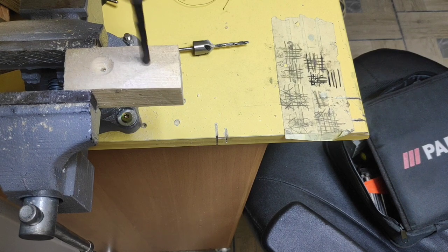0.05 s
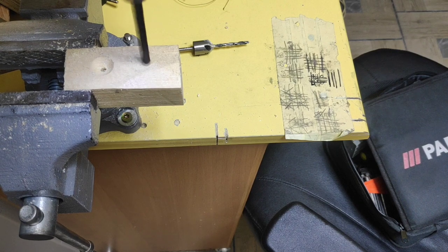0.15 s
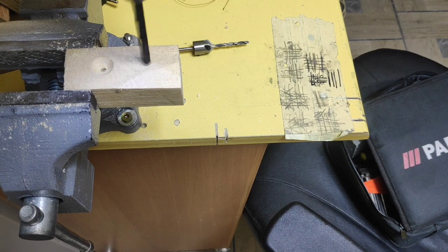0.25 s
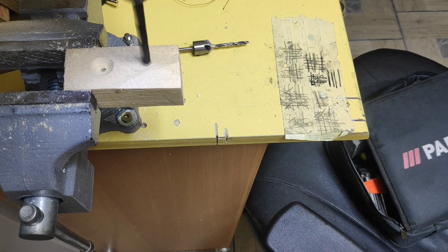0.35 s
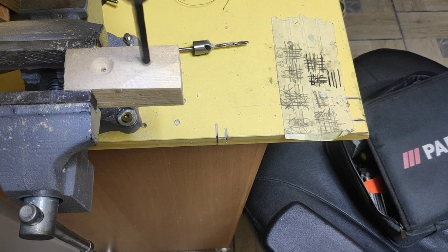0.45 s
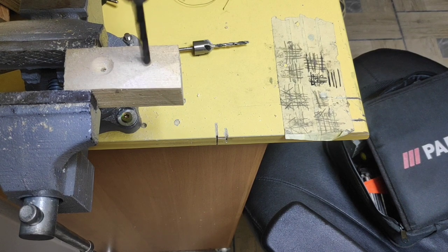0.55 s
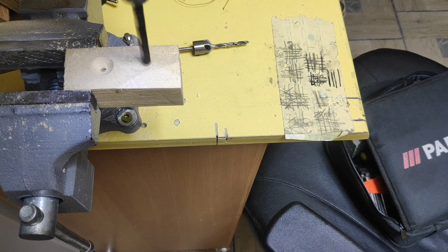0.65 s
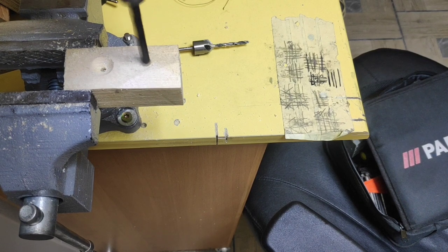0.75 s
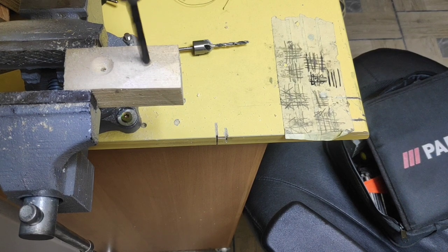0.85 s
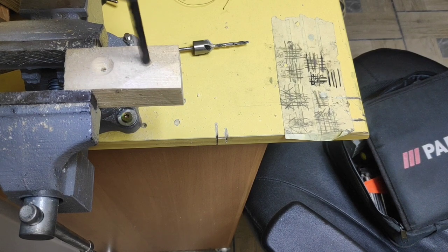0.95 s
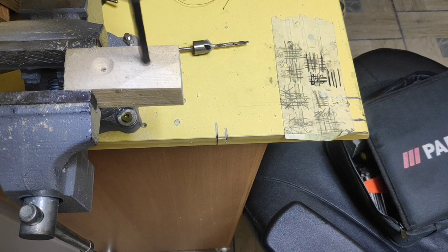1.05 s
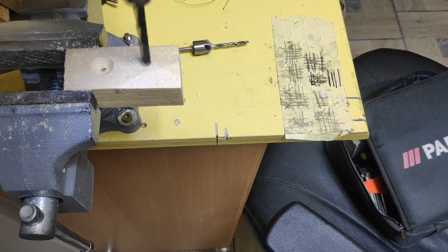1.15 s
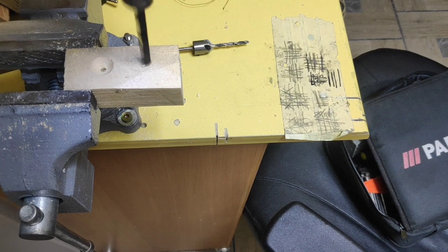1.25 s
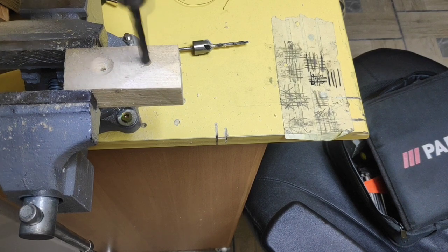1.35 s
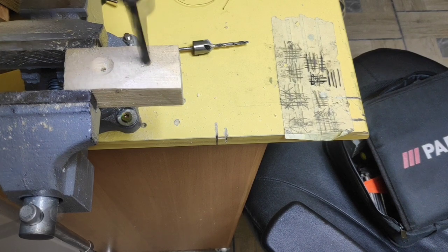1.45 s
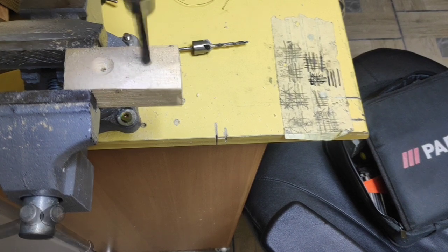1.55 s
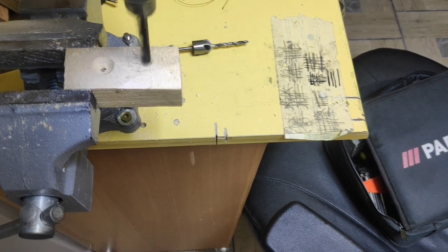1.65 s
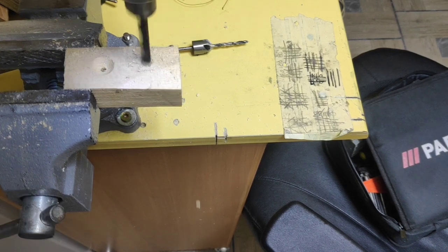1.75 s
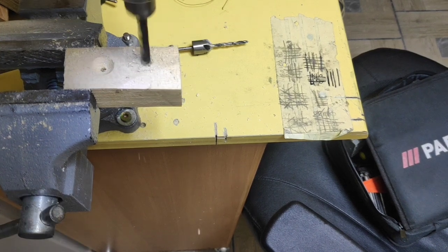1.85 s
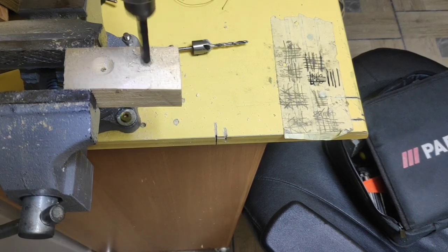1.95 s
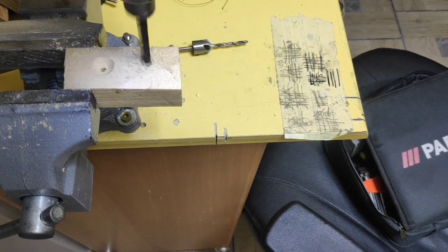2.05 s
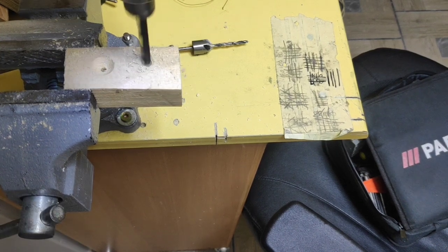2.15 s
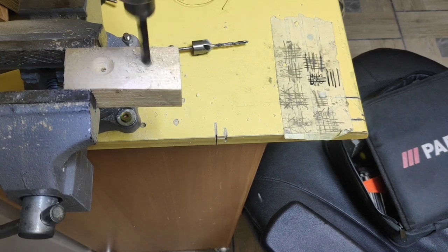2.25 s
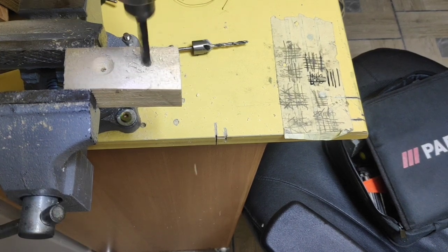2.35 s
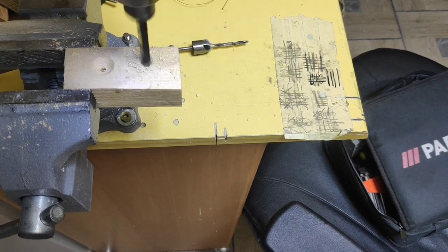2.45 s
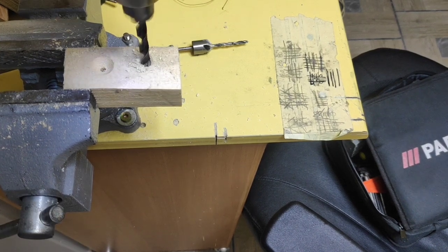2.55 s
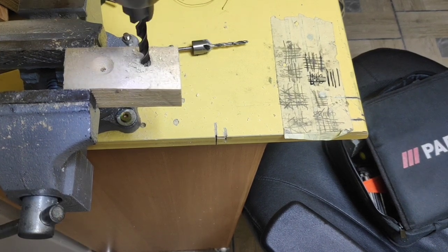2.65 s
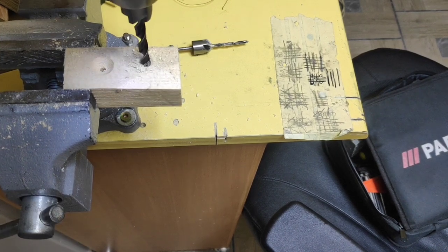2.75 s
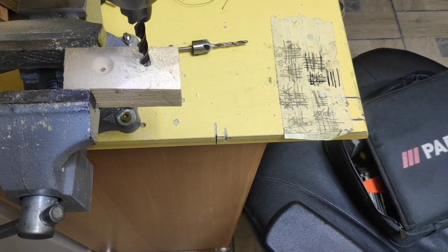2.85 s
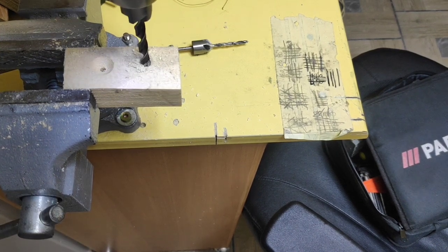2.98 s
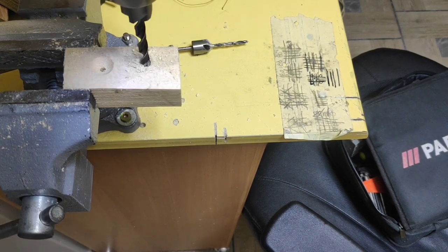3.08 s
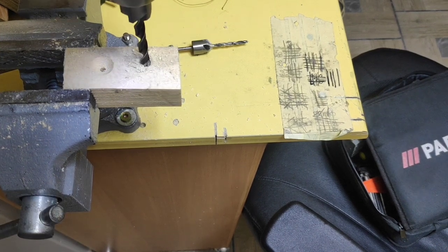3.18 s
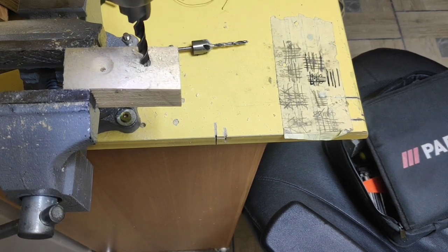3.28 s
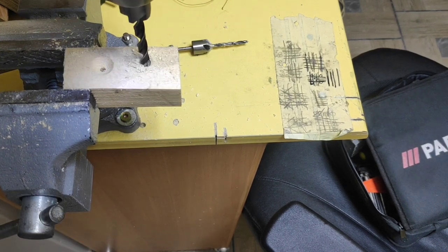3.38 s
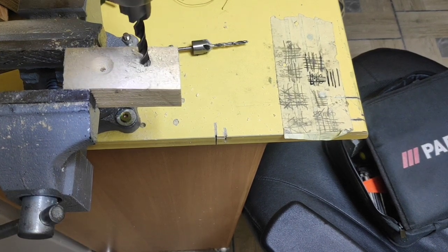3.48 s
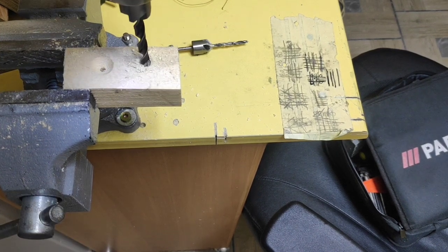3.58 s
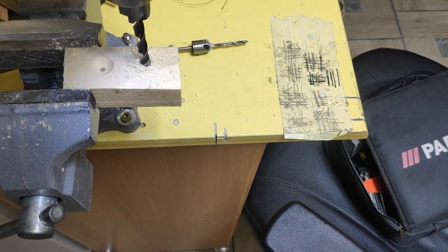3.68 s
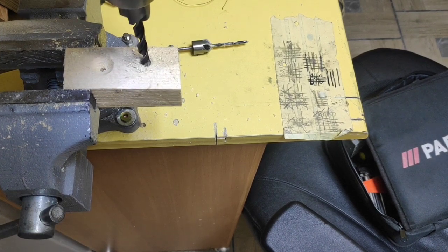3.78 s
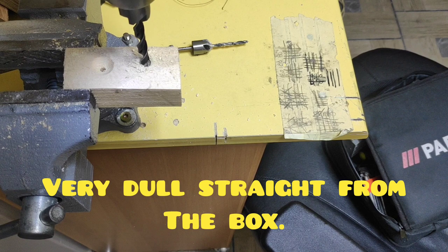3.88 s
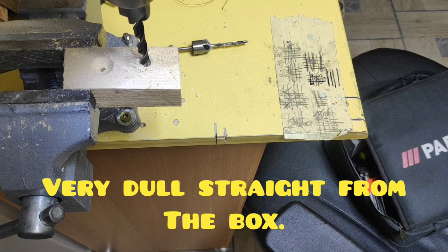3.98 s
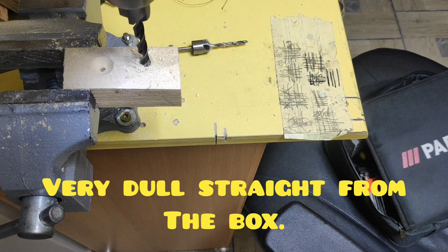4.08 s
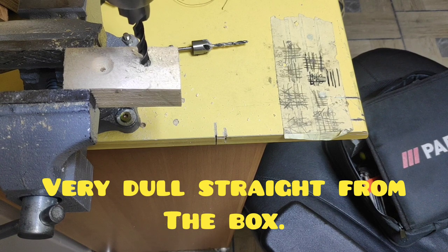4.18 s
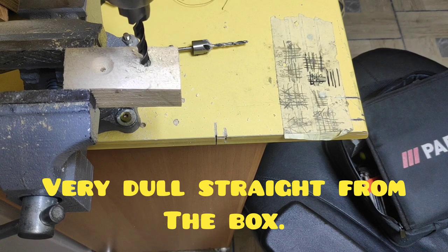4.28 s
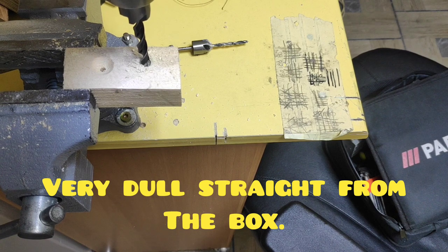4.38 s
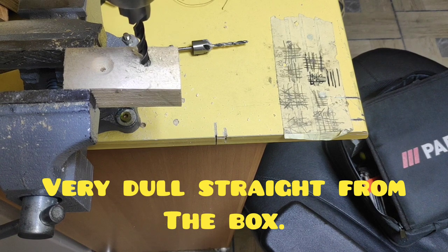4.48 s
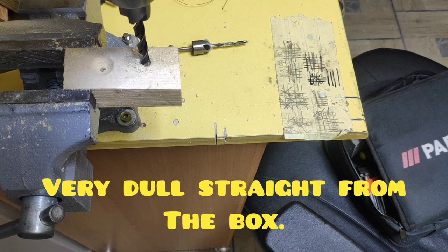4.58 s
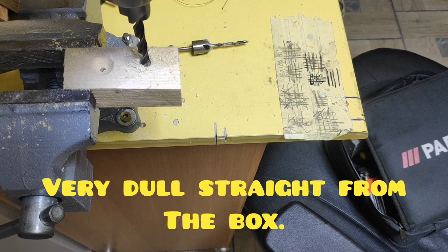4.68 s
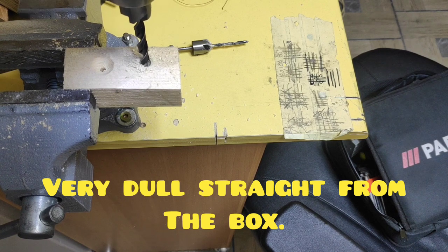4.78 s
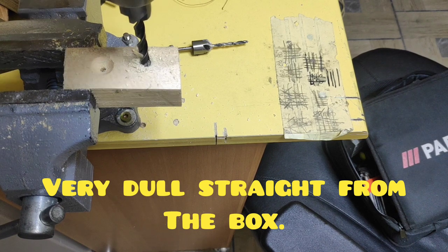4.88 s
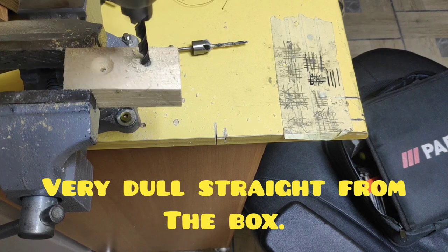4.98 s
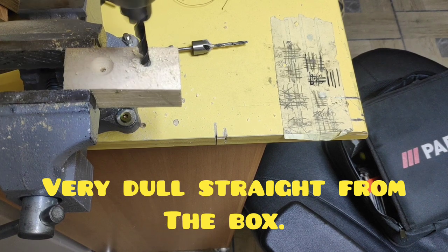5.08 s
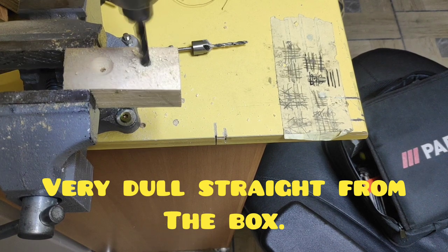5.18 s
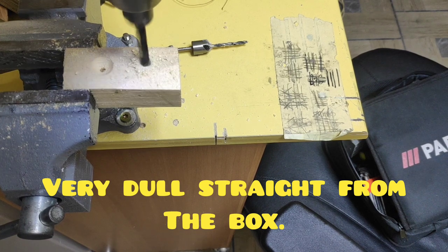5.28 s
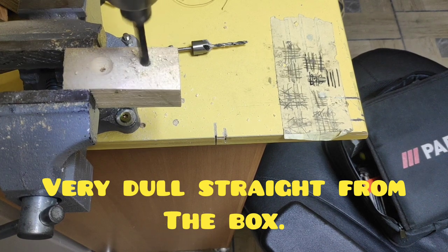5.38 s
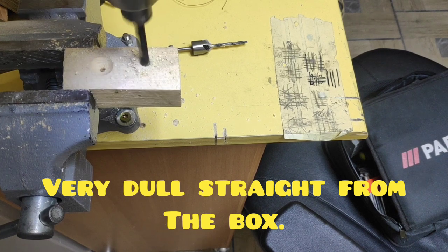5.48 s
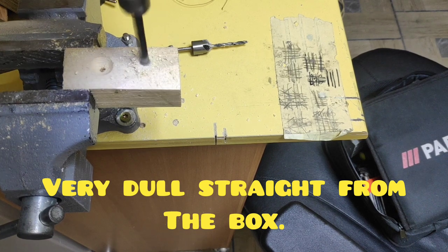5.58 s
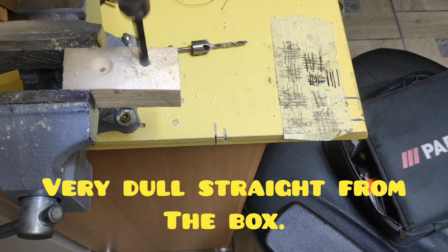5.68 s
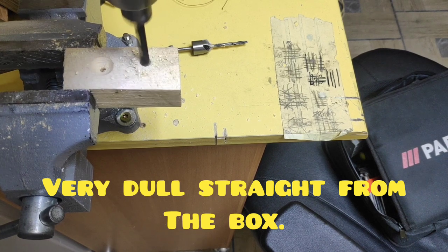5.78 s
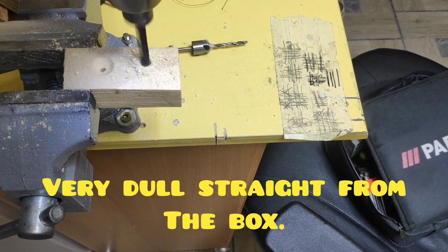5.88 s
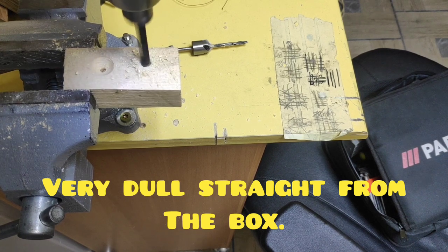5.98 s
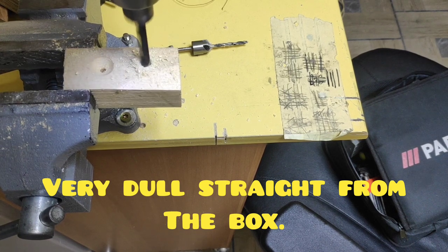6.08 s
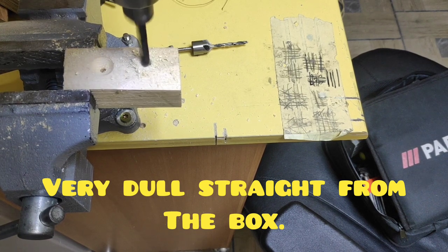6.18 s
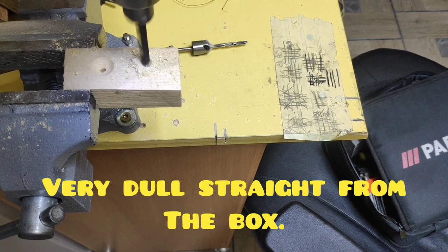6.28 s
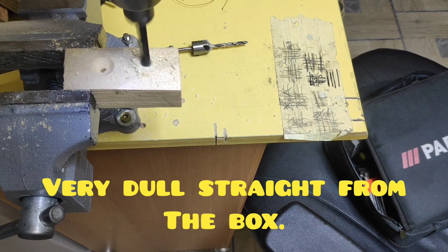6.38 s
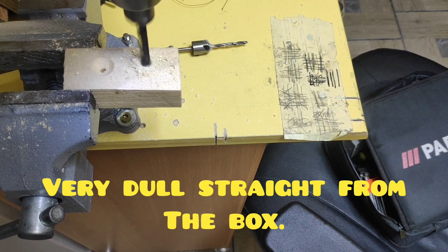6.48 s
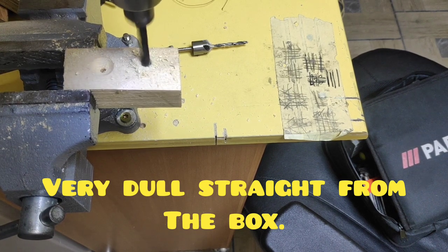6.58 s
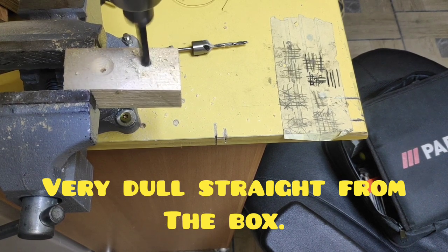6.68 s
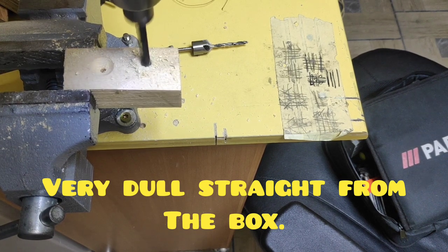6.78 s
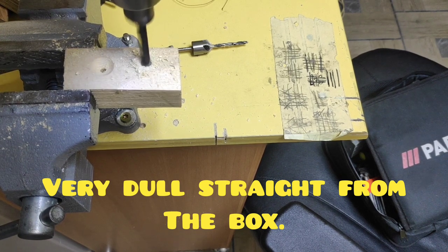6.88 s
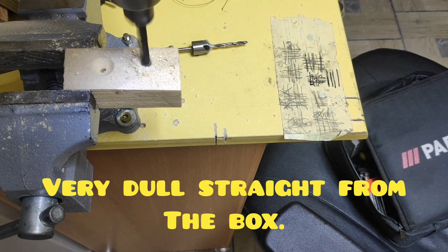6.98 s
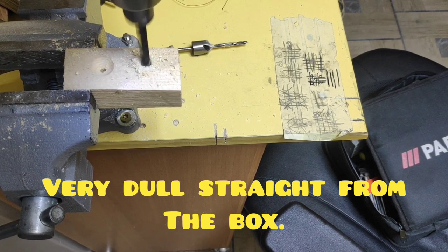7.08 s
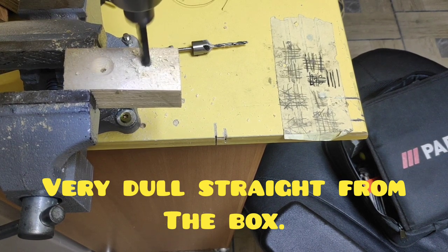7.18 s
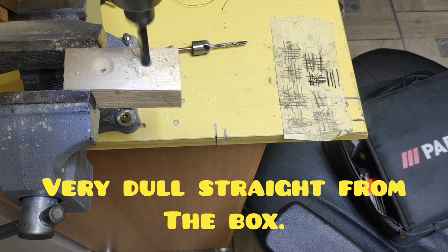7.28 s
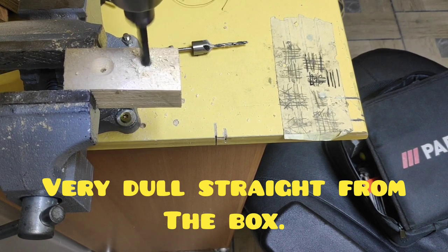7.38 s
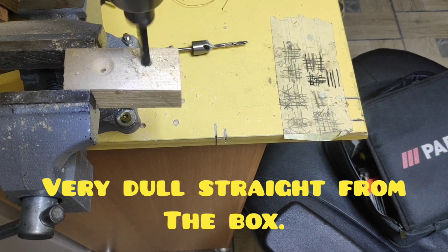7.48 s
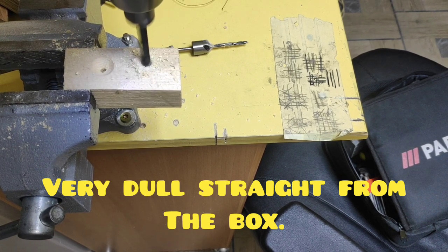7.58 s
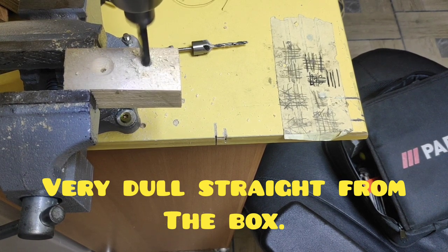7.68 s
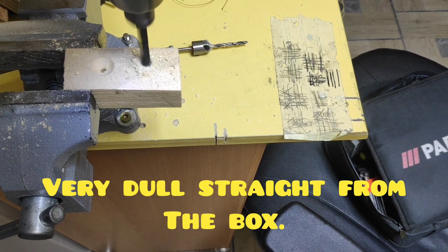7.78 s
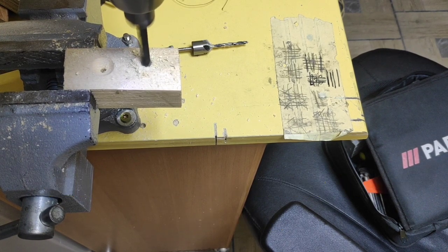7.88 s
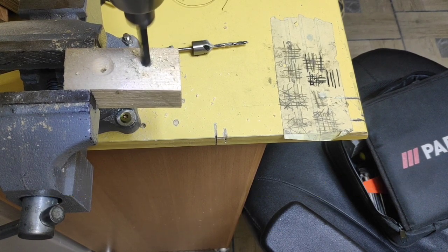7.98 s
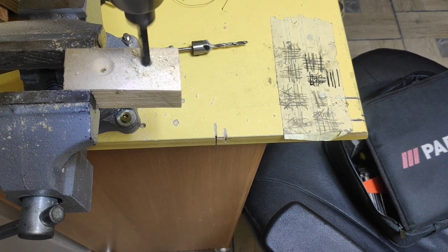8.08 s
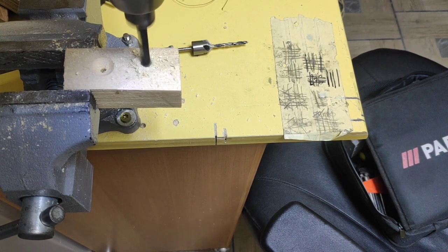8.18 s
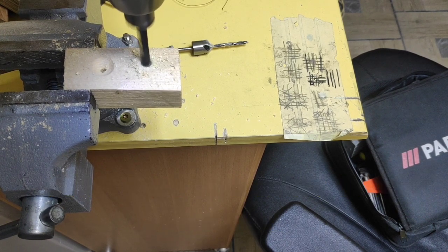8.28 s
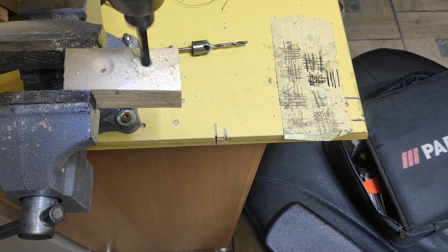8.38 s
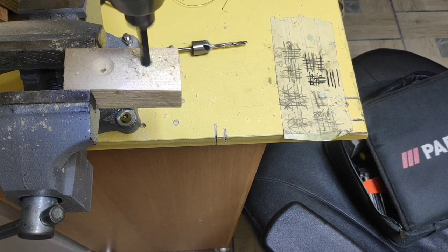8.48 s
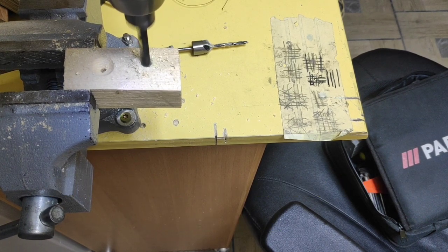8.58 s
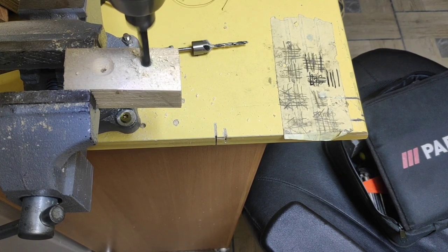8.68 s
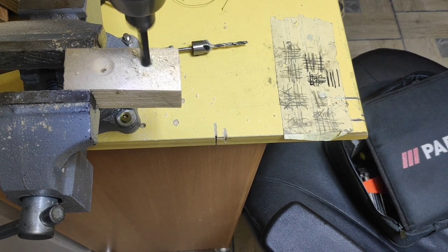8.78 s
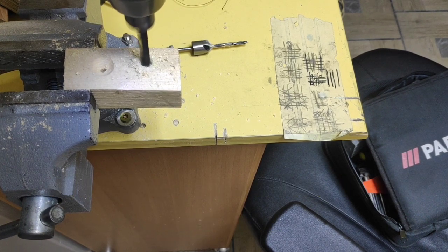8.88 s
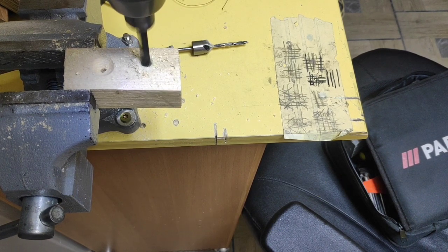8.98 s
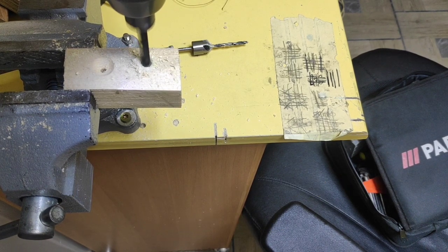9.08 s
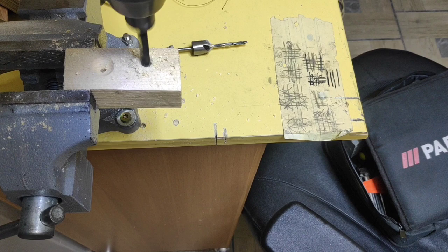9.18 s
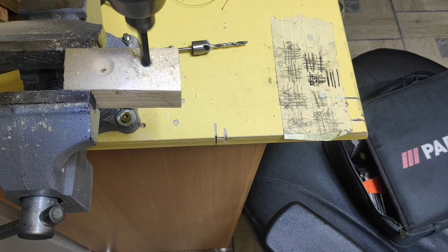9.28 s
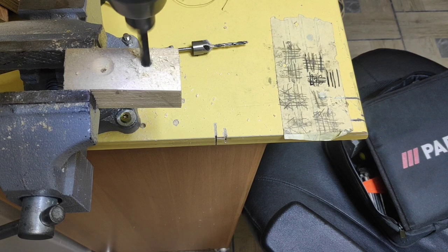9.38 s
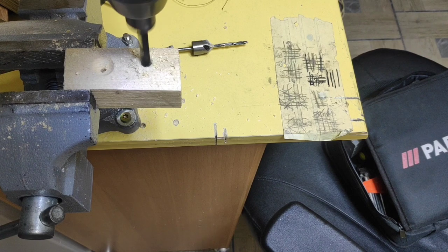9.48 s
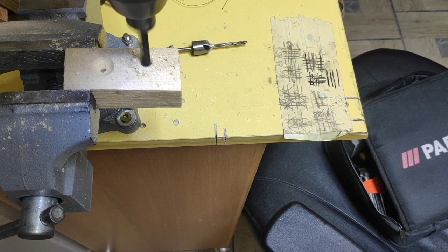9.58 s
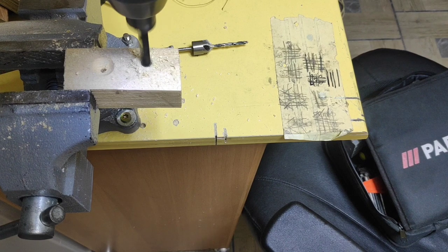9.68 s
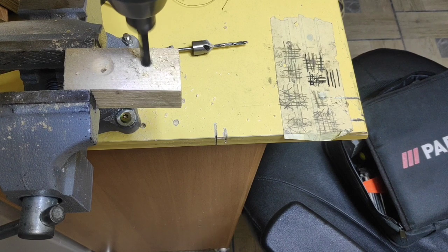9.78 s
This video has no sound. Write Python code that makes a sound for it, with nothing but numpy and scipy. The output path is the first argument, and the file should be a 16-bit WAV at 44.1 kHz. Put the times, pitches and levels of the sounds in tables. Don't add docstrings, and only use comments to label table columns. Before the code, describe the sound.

Close, loud drill whine with gritty rushing air brakes abruptly, small hand clicks follow in quiet, then a long steady boring burst runs to the end.

```python
import sys
import numpy as np
from scipy import signal
from scipy.fft import rfft, irfft
from scipy.io import wavfile

SR = 44100
rng = np.random.default_rng(int(sys.argv[2]) if len(sys.argv) > 2 else 0)


def put_to_file(sound):
    columns = np.atleast_2d(sound).T
    safe = np.clip(columns, -1, 1)
    whole_steps = np.round(safe * 32767)
    wavfile.write(sys.argv[1], SR, whole_steps.astype(np.int16))


def to_linear_factor(level_db):
    exponent = np.asarray(level_db, float) / 20
    return 10 ** exponent


N = 433944
T = np.arange(N) / SR
HZ = np.maximum(np.arange(N // 2 + 1) * SR / N, 1)

# (start [s], fade-in [s], end [s], fade-out [s], air level [dB])
BURSTS = [
    (-0.1, 0.05, 2.02, 1.0, -15.5),
    (1.15, 1.0, 2.635, 0.045, -15.5),
    (4.585, 1, 10.5, 0.1, -15),
]
BITE = [0.23, 0.35, 0.69]
# (time [s], rotor speed [turns/s], grip passing on the tones [dB])
SPEEDS = [
    [(0, 401.3, -2), (0.1, 402.5, 4.5), (0.17, 401.2, -1), (0.9, 404, 0), (1.2, 397.5, -2.5),
     (1.4, 403, -0.5), (2.0, 389.2, 3)],
    [(1.15, 381, -4.5), (1.6, 379.7, -1), (1.8, 375.6, -1), (2.05, 382, 1), (2.4, 380, 0.5),
     (2.52, 393.7, -2.5)],
    [(4.58, 384.2, -10), (5.1, 385, -4.5), (5.27, 403, -6.5), (5.5, 408.8, 0), (5.7, 410.7, -3),
     (6.07, 397.8, 1.5), (6.4, 385.7, -0.5), (6.68, 390.6, 3.5), (7.0, 391.2, 2), (7.15, 389, 0.5),
     (8.17, 387.5, -1.5), (8.27, 374, -0.5), (8.55, 383, -1), (8.72, 375.8, -1.5), (8.9, 375.5, 2),
     (9.25, 384.8, -5), (9.58, 377.2, -0.5), (9.84, 383, -2)],
]
# (slow [dB], mid [dB], fast [dB], share of grip [dB/dB], steepness with speed reached [power])
VOICES = [
    (-45, -41.5, -38.5, -0.0054, 4.0),
    (-30, -26, -27, 0.97, 2.9),
    (-38.5, -37.5, -32, 0.3, 2.6),
    (-24, -34, -42, 0.3, 2.5),
    (-38.5, -31.5, -34.5, 0.75, 2.0),
]
# (multiple of rotor speed [ratio], voice [0-4], level [dB], left minus right [dB], left lead [rad])
PARTIALS = [(1, 0, 0, -0.79, 0.018), (2, 0, -8.5, -9.5, -2), (4, 4, -1, -6, 2.5), (8, 1, -1.5, -9.5, -2.0),
            (20 / 3, 3, -11.5, .1, 2.7), (26 / 3, 3, -7, -.6, 2.55), (28 / 3, 1, -7.5, 1.5, -1),
            (10, 2, 0, -6, 1.6), (13, 2, 1, -9, 0.5), (15, 1, -10.5, -7.5, 2), (56 / 3, 3, 0, -3.5, -1),
            (28, 2, 1.1, 5.4, 1.18)]
# slow, mid, fast (level [dB])
ROAR_DB = (-17.5, -17, -15)
# (frequency [Hz], density [dB/Hz])
FREE = [(40, -34.5), (200, -14), (450, -14), (800, -9), (1300, -2), (2400, -5.5), (3000, -1.5),
        (4000, -2.5), (5800, -1.5), (7400, 0.5), (9600, -12.5), (10800, -3), (12700, -1.5), (14200, -14.5)]
# (frequency [Hz], density [dB/Hz])
LOADED = [(45, -10.5), (105, -16), (330, -29), (800, -2), (1300, -9.5), (2400, -13.5), (3000, -15.5),
          (4000, -3.5), (5000, -8), (7000, 1.5), (9500, -6), (10800, -4.5), (12700, -11.5), (14200, -8.5)]
# (frequency [Hz], width [Hz], level [dB])
HOUSING = [(870, 64, 3), (2525, 190, 5), (2840, 130, -4.5), (3400, 120, -2), (3650, 100, -3.5),
           (8950, 220, 2), (1108, 160, 4), (4140, 100, 2), (5680, 69, 3.5), (6750, 250, 0.5),
           (10900, 400, -0.5)]
# (frequency [Hz], left minus right [dB])
TILT = [(100, 1), (370, 1.5), (800, -4), (2300, -1.5), (4200, -2.5), (7300, -6.5), (9000, 3), (11200, 9.5),
        (12700, 11), (14200, 7.5)]
# (frequency [Hz], likeness [0-1])
ALIKE = [(60, 0.2), (170, .95), (700, .75), (1700, 0.63), (2800, 0.83), (4300, 0.73), (6500, 0),
         (12000, .1)]
# (time [s], start [Hz], end [Hz], length [s], level [dB])
BRAKE = [
    (2.572, 1500, 830, .028, -19),
    (2.577, 6100, 5800, .012, -14.5),
    (2.533, 2700, 6600, .04, -23),
]
# (time [s], peak [dB], frequency [Hz], ring [s], left minus right [dB])
TICKS = [
    (2.8778, -34, 3640, .007, -6.5),
    (2.8766, -48, 6000, .005, -4),
    (3.2077, -25.5, 7150, .004, -7.5),
    (3.2088, -39, 11500, .004, -2.5),
    (3.2102, -31, 5350, .006, -6.5),
    (3.211, -37, 3220, 0.0057, -4),
    (3.2138, -38, 3400, .006, -7),
    (3.388, -41.5, 6300, .005, -3.5),
    (3.3905, -31.5, 3510, 0.0057, -6.5),
]
# (time [s], peak [dB], frequency [Hz])
BUMPS = [
    (2.822, -44, 100),
    (2.88, -38, 90),
    (3.70, -48, 130),
    (4.36, -51, 160),
    (5.765, -23.5, 115.7),
]
# (time [s], peak [dB], rise [s/20 dB], fall [s/20 dB])
RUSTLE = [
    (3.065, -54, .028, .03),
    (3.215, -54.5, .045, .06),
    (3.41, -61, .05, .07),
    (3.73, -62, .04, .04),
    (3.862, -47, .014, .035),
    (3.898, -42, 0.023, 0.041),
    (4.36, -58.5, 0.055, 0.14),
    (4.445, -52, 0.082, .085),
]
# (frequency [Hz], density [dB/Hz])
FLOOR = [(40, -1), (90, -6), (200, -0.5), (450, -6), (800, -3.5), (1300, -10), (2300, -8), (3000, -15),
         (4000, -13.5), (5500, -19), (7200, -22), (9300, -19.5), (11500, -19), (14200, -12.5)]
# (frequency [Hz], level [dB])
MAINS = [(50, -70), (100, -85), (150.7, -73.5), (301.5, -75.5)]

SLOW_HZ, MID_HZ, FAST_HZ = 380.4, 389, 404
SPIN_UP_S, SPIN_UP_LACK, SPIN_UP_SHAPE = 0.052, 0.47, 1.4
BRAKE_S, BRAKE_PER_S2 = 2.52, 45.0
GRAB_S, GRAB_WIDTH_S, GRAB_HISS_DB, GRAB_ROAR_DB = 2.587, 0.012, 6.5, 6.5
FLICKER_DB, FLICKER_PER_S = 1.14, 3.6
TREMBLE, STRAIN_TREMBLE = 0.000503, 0.15
BITE_PER_GRIP_DB, BRAKE_HUSH = -0.02, 1.5
BENCH_DB, BENCH_FLICKER_DB, BENCH_GRIP = -35.5, 2, 1.1
PORT_LAG_S = 0.00021
RUSTLE_REST_DB, FLOOR_DB = -74, -58
ROOM_T60_S, ROOM_DB, WALL_CUT_HZ = 0.5, -5, 11000


def whine(which):
    start, end = BURSTS[which][0], BURSTS[which][2]
    span = slice(max(int(start * SR), 0), min(int(end * SR), N))
    fade, steady_hz, reached, grip_db = [c[span] for c in motion(which)]
    turns_hz = steady_hz * reached
    flicker = FLICKER_DB * drift(FLICKER_PER_S)
    gains = []
    for k, (slow, mid, fast, grip_share, steep) in enumerate(VOICES):
        level_db = by_speed(steady_hz, (slow, mid, fast)) + grip_share * grip_db
        if k > 0:
            level_db = level_db + np.roll(flicker, 41017 * k)[span]
        gains.append(fade * reached ** steep * to_linear_factor(level_db))
    strain = 1 + STRAIN_TREMBLE * (MID_HZ - steady_hz).clip(0)
    tremble = TREMBLE * strain * drift(25.0)[span]
    phase = 2 * np.pi * np.cumsum(turns_hz * (1 + tremble)) / SR
    out, wander = np.zeros((2, N)), drift(11.0)
    for k, (multiple, voice, db, pan_db, lead) in enumerate(PARTIALS):
        waver_db = min(0.07 * multiple, 1.5) * np.roll(wander, 30011 * k)[span]
        if voice in (2, 4):
            waver_db = waver_db + np.clip(0.005 * SR * np.gradient(turns_hz), 0, 9)
        if voice == 3:
            waver_db = waver_db + 4.0 * np.sin(phase / 11.0)
        height = np.sqrt(2) * gains[voice] * to_linear_factor(db + waver_db)
        tilt = to_linear_factor(pan_db / 2)
        out[0, span] += height * tilt * np.sin(multiple * phase + lead + k)
        out[1, span] += height / tilt * np.sin(multiple * phase + k)
    return out


def motion(which):
    start, rise, end, fall, _ = BURSTS[which]
    fade = np.clip((T - start) / rise, 0, 1) * np.clip((end - T) / fall, 0, 1)
    reached = 1 - SPIN_UP_LACK * np.exp(-(T / SPIN_UP_S) ** SPIN_UP_SHAPE)
    if start < BRAKE_S:
        reached = reached * np.clip(1 - BRAKE_PER_S2 * (T - BRAKE_S).clip(0) ** 2, 0.3, 1)
    s, *columns = np.transpose(SPEEDS[which])
    steady_hz, grip_db = [np.interp(T, s, c) for c in columns]
    return fade, steady_hz, reached, grip_db


def by_speed(steady_hz, levels_db):
    return np.interp(steady_hz, [SLOW_HZ, MID_HZ, FAST_HZ], levels_db)


def rush():
    flow, load, roar_db, grip_db = airflow()
    grit = to_linear_factor(1.0 * drift(250.0) + 0.5 * drift(30.0))
    white = rfft(rng.standard_normal((3, N)) * grit)
    ports = at_ports(white[0], white[1:])
    peaks_db = sum(db / (1 + (2 * (HZ - hz) / width) ** 2) for hz, width, db in HOUSING)
    low = 1 / (1 + (HZ / 2600) ** 8)
    out = 0
    for spectrum, share in ((FREE, 1 - load), (LOADED, load)):
        coloured = ports * to_linear_factor(at_hz(spectrum) + peaks_db)
        hiss = rms_one(irfft(coloured * (1 - low), N))
        roar = rms_one(irfft(coloured * low, N))
        out = out + share * (hiss + to_linear_factor(roar_db + 1.0) * roar)
    bench = bench_mode(161, 24) + 0.472 * load * bench_mode(211, 40)
    bench_db = BENCH_DB + BENCH_GRIP * grip_db + BENCH_FLICKER_DB * drift(1.0)
    return flow * (patchy(out, depth_db=0.63) + to_linear_factor(bench_db) * bench)


def airflow():
    power, sums = 1e-12, 0
    for which, bite in enumerate(BITE):
        fade, steady_hz, reached, grip_db = motion(which)
        hush = np.where(T > 1, reached ** BRAKE_HUSH, 1)
        heard = (fade * to_linear_factor(BURSTS[which][4]) * hush) ** 2
        roar_db = by_speed(steady_hz, ROAR_DB) - 12.0 * (1 - reached) * (T < 1)
        power = power + heard
        sums = sums + heard * np.array([bite + BITE_PER_GRIP_DB * grip_db, roar_db, grip_db])
    load, roar_db, grip_db = sums / power
    jolt = np.exp(-((T - GRAB_S) / GRAB_WIDTH_S) ** 2)
    flow = np.sqrt(power) * to_linear_factor(GRAB_HISS_DB * jolt)
    return flow, np.clip(load, 0, 1), roar_db + GRAB_ROAR_DB * jolt, grip_db


def at_ports(common, own):
    alike = np.clip(at_hz(ALIKE), 0, 1)
    lag = np.exp(-2j * np.pi * HZ * PORT_LAG_S * np.array([[1], [0]]))
    tilt = to_linear_factor(at_hz(TILT) * np.array([[0.5], [-0.5]]))
    return tilt * (np.sqrt(alike) * lag * common + np.sqrt(1 - alike) * own)


def bench_mode(hz, width_hz):
    shaken = resonance(rng.standard_normal(N), hz, width_hz)
    return rms_one(resonance(shaken, hz, width_hz))


def patchy(x, depth_db):
    spectrum, sway = rfft(x), drift(2.5)
    place = 2.5 * np.log2(HZ / 500).clip(0, 5)
    out = 0
    for k in range(14):
        band = irfft(spectrum * (1 - abs(place - k)).clip(0), N)
        out = out + band * to_linear_factor(depth_db * np.roll(sway, 31013 * k))
    return out


def brake():
    out = np.zeros(N)
    for s, start_hz, end_hz, length, db in BRAKE:
        u = np.clip((T - s) / length, 0, 1)
        turns = length * (start_hz * u + (end_hz - start_hz) * u * u / 2)
        out += to_linear_factor(db) * np.sin(np.pi * u) ** 2 * np.sin(2 * np.pi * turns)
    return out


def hands():
    out = np.zeros((2, N))
    thin = rms_one(resonance(rng.standard_normal((2, N)), 7500, 6000))
    for s, db, hz, ring_s, pan_db in TICKS:
        age = (T - s).clip(0)
        tick = np.sin(2 * np.pi * hz * age) + 0.4 * thin * (T > s)
        tick = tick * to_linear_factor(-60 * age / min(ring_s, 0.009))
        out += to_linear_factor(db + pan_db * np.array([[0.5], [-0.5]])) * tick
    for s, db, hz in BUMPS:
        age = (T - s).clip(0)
        sag = np.sin(2 * np.pi * hz * age / (1 + 8 * age))
        out += to_linear_factor(db - 60 * age / 0.067) * sag * np.minimum(age / 0.006, 1)
    grains = rng.standard_normal((2, N)) * to_linear_factor(2.5 * drift(300.0))
    cloth = rms_one(resonance(grains, 6800, 3500) + 0.4 * resonance(grains, 12000, 2500))
    level = to_linear_factor(RUSTLE_REST_DB)
    for s, db, rise, fall in RUSTLE:
        level = level + to_linear_factor(db - 20 * np.where(T < s, (s - T) / rise, (T - s) / fall))
    return out + level * cloth


def workshop(x):
    age = np.arange(SR // 2) / SR
    tail = rng.standard_normal((2, len(age))) * to_linear_factor(-60 * age / ROOM_T60_S) * (age > 0.004)
    dull = signal.sosfilt(signal.butter(1, WALL_CUT_HZ, fs=SR, output="sos"), tail)
    tail = dull + (tail - dull) * to_linear_factor(-30 * age / ROOM_T60_S)
    tail = signal.sosfilt(signal.butter(1, 500.0, "high", fs=SR, output="sos"), tail)
    tail = tail / np.sqrt(np.sum(tail ** 2, axis=1, keepdims=True))
    return to_linear_factor(ROOM_DB) * signal.fftconvolve(x, tail, axes=1)[:, :N]


def room_tone():
    white = rfft(rng.standard_normal((3, N)))
    alike = 1 / (1 + (HZ / 500) ** 2)
    air = irfft(to_linear_factor(at_hz(FLOOR)) * (np.sqrt(alike) * white[0] + np.sqrt(1 - alike) * white[1:]), N)
    far = rms_one(resonance(rng.standard_normal((2, N)), 2200, 130)) * to_linear_factor(-67 + 3.5 * drift(8.8))
    far += rms_one(resonance(rng.standard_normal((2, N)), 5800, 900)) * to_linear_factor(-68.5 + 1.5 * drift(6.0))
    hum = sum(np.sqrt(2) * to_linear_factor(db) * np.sin(2 * np.pi * hz * T) for hz, db in MAINS)
    return to_linear_factor(FLOOR_DB) * rms_one(air) + far + hum


def resonance(x, hz, width_hz):
    r = np.exp(-np.pi * width_hz / SR)
    poles = [1, -2 * r * np.cos(2 * np.pi * hz / SR), r * r]
    return signal.lfilter([(1 - r * r) / 2, 0, (r * r - 1) / 2], poles, x)


def drift(rate):
    r = np.exp(-2 * np.pi * rate * 16 / SR)
    slow = signal.lfilter([1], [1, -2 * r, r * r], rng.standard_normal(N // 16 + 4002))[4000:]
    return np.interp(np.arange(N) / 16, np.arange(len(slow)), rms_one(slow))


def at_hz(points):
    hz, value = np.transpose(points)
    return np.interp(np.log(HZ), np.log(hz), value)


def rms_one(x):
    return x / np.sqrt(np.mean(x ** 2) + 1e-20)


def scene():
    tones = sum(whine(which) for which in range(len(BURSTS)))
    noises = rush() + brake() + hands()
    return tones + noises + workshop(noises + to_linear_factor(-9) * tones) + room_tone()


def band_limit(x):
    return signal.sosfilt(signal.butter(12, 14270, fs=SR, output="sos"), x)


def record(dry):
    return band_limit(1.2 * np.tanh(dry / 1.2))


dry = scene()
out = record(dry)
put_to_file(out)
```